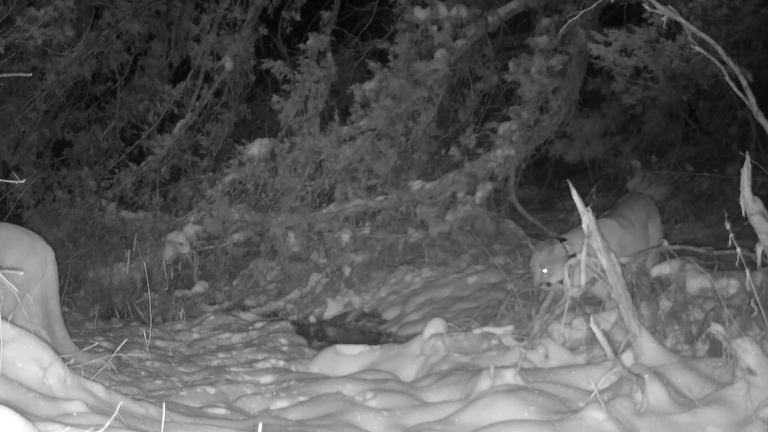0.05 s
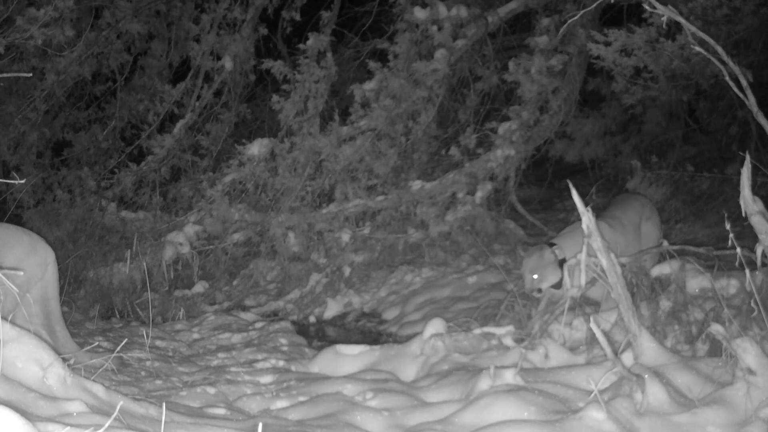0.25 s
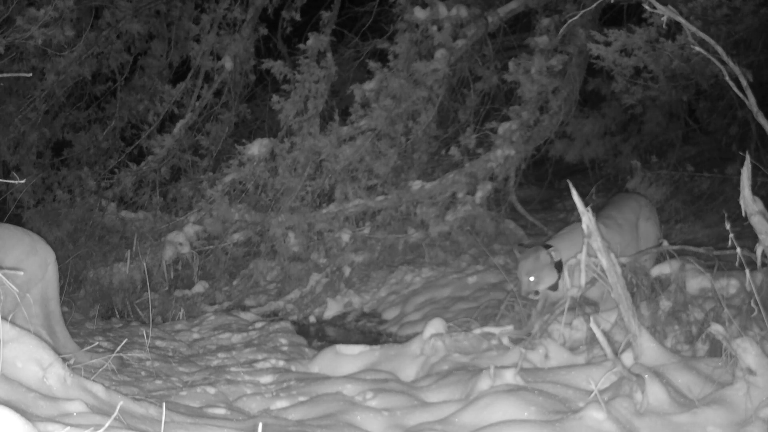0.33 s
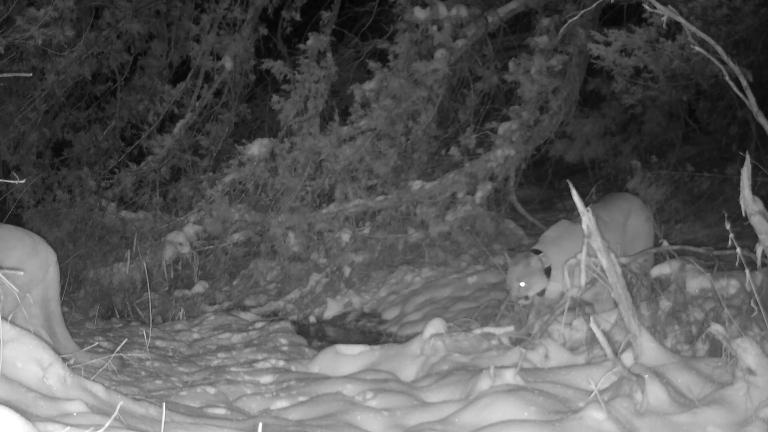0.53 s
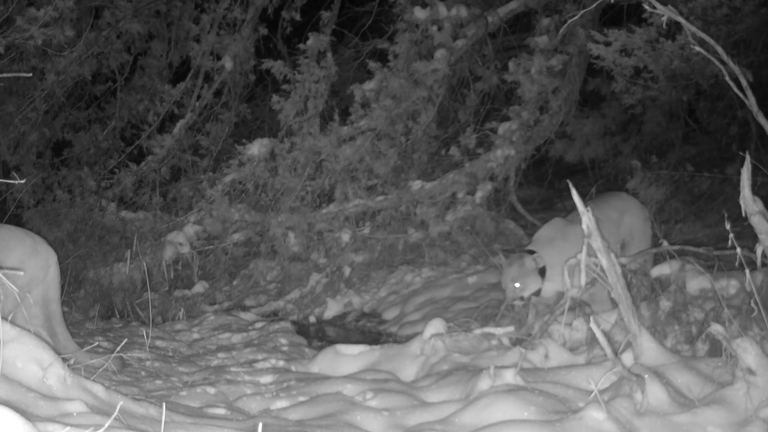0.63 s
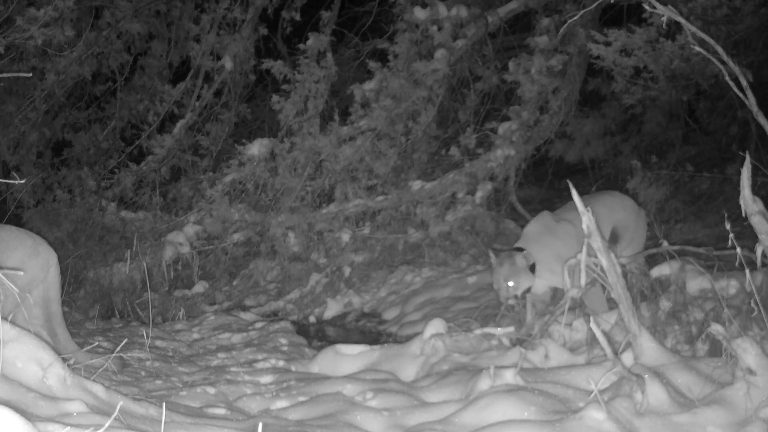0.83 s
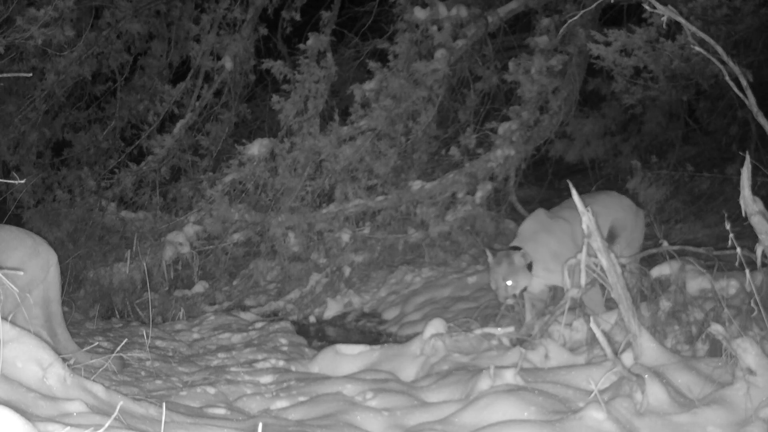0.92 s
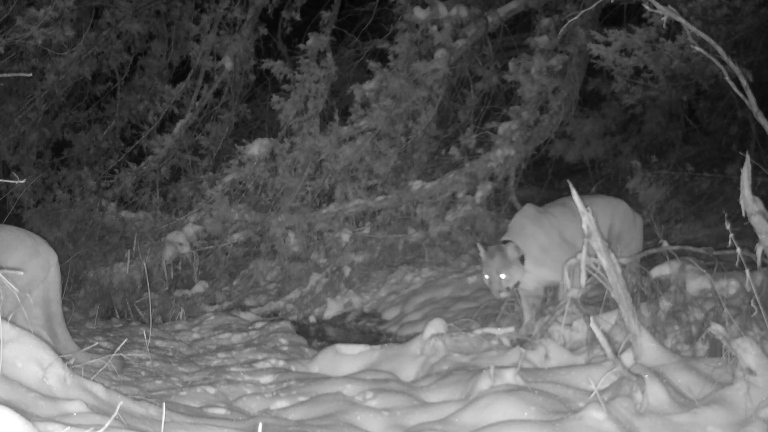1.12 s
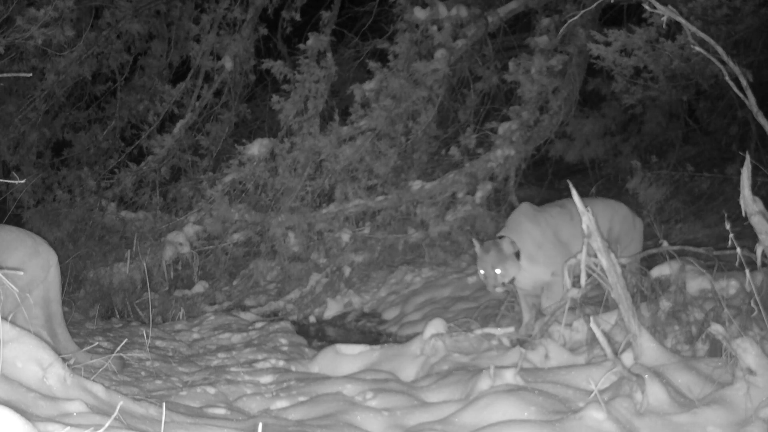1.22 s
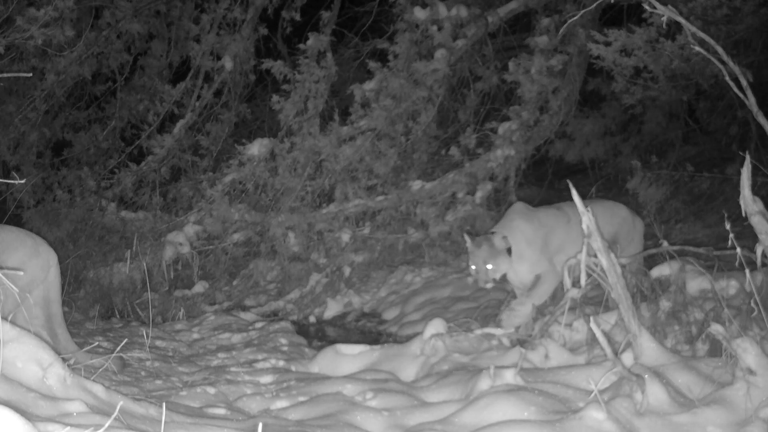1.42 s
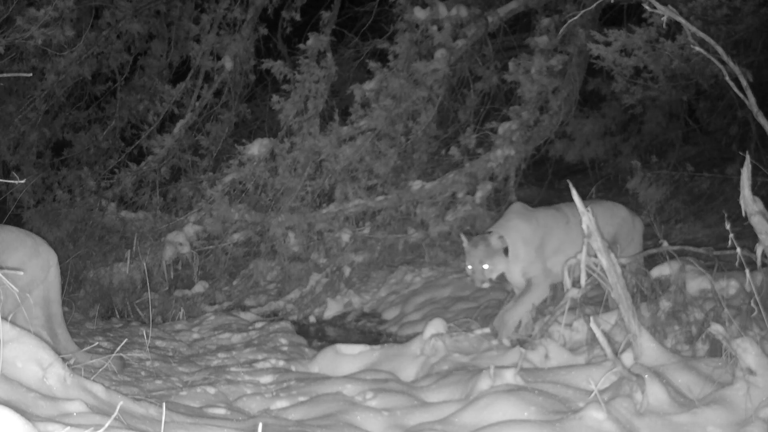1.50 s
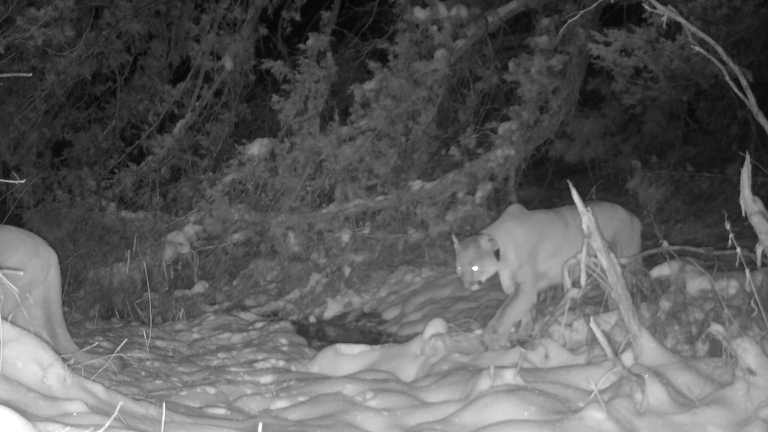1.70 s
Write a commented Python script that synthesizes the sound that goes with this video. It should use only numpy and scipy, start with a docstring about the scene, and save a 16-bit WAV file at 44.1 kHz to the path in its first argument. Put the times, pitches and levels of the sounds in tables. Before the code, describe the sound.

One raspy cry from a big wild cat sputters out in clicks, over soft steady hiss.

```python
"""A mountain lion in a clearing, heard through the narrow-band microphone of a trail camera.
The camera's own hiss and thin, buzzing whine run from the start. The cat gives a short creak that slows
to clicks, then one hoarse cry that swells, sags in pitch and sputters out in clicks and rasps of air.
Uneven vocal-fold pulses and a little turbulent air ring its throat and mouth.
The voice is well forward; behind it the trees answer faintly."""
import sys
import numpy as np
from scipy import signal
from scipy.fft import rfft, irfft
from scipy.io import wavfile

SR = 44100
rng = np.random.default_rng(int(sys.argv[2]) if len(sys.argv) > 2 else 0)


def master(y):
    """Save y as 16-bit WAV."""
    cut = np.clip(np.atleast_2d(y).T, -1, 1)
    pcm = np.round(cut * 32767)  # scale
    wavfile.write(sys.argv[1], SR, pcm.astype(np.int16))


N = 77175

# upper resonances of the throat and mouth: centre_hz, width_hz, relative_db
UPPER_RESONANCES = [(2750, 360, -23), (3360, 550, -9), (3790, 580, -12.5), (4036, 480, -14.5),
                    (4390, 300, -17)]
SCATTER = .02  # pulse-to-pulse spread of a resonance at full roughness, as a share of its frequency
CREAK_GAIN_DB, VOICE_GAIN_DB = 9, 10  # on top of the tabled levels: creak; cry and clicks


def amp(db):
    """Decibels to gain."""
    return 10 ** (np.asarray(db) / 20)


def unit(x):
    """Scale to rms 1."""
    return x / np.sqrt(np.mean(x ** 2) + 1e-20)


def at(rows, times):
    """Each column of a curve at the given times."""
    knots, *columns = np.transpose(rows)
    return [np.interp(times, knots, column) for column in columns]


def noise(colour):
    """Noise of rms 1 with a (frequency_hz, level_db) colour, falling steeply above its last point."""
    knots_hz, db = np.transpose(colour)
    hz = np.fft.rfftfreq(N, 1 / SR)
    gain = amp(np.interp(np.log(hz + 1), np.log(knots_hz), db)) / (1 + (hz / knots_hz[-1]) ** 12)
    return unit(irfft(rfft(rng.standard_normal(N)) * gain, N))


def cut(x, hz, kind, order):
    """Causal high-pass or low-pass."""
    return signal.sosfilt(signal.butter(order, hz, kind, fs=SR, output="sos"), x)


def camera_hiss(hiss_db=-56.5, fizz_db=-84.5):
    """The camera's noise floor: steady midrange hiss over a faint white fizz."""
    # spectrum of the hiss: frequency_hz, relative_db
    colour = [(15, -61.5), (25, -21), (131, -9), (196, -5.5), (258, -6.5), (316, -2.5), (362, -3.5),
              (433, -2), (475, -1.5), (508, -1.5), (730, 0), (2320, -5.5), (5600, -29.5), (7280, -64.5),
              (12300, -120)]
    return amp(hiss_db) * noise(colour) + amp(fizz_db) * rng.standard_normal(N)


def camera_whine(whine_hz=7796, flip_hz=29.68, lopsided=.3):
    """A lopsided electronic whine whose polarity flips with a tick about sixty times a second."""
    t = np.arange(N) / SR
    phase = 2 * np.pi * whine_hz * t
    polarity = np.sign(np.sin(2 * np.pi * flip_hz * (t - .003)))  # two flips a cycle
    buzz = cut((polarity + lopsided) * np.sin(phase), 12000, "low", order=4)
    edges = np.diff(polarity, prepend=polarity[0])
    ticks = cut(cut(edges, 4800, "high", order=2), 7200, "low", order=6)
    overtone = np.sin(2 * phase)
    return amp(-76) * unit(buzz) + amp(-88) * unit(ticks) + amp(-95.5) * unit(overtone)


def fold_closings(curve):
    """The times at which the vocal folds close, once in each cycle of the pulse rate."""
    t = np.arange(curve[0][0], curve[-1][0], 1 / SR)
    cycles = np.cumsum(at(curve, t)[0]) / SR
    return np.interp(np.arange(.5, cycles[-1]), cycles, t)


def ring_throat(times, pulse_db, resonances, air_db=-11, air_decay_s=.0008, rise_s=.00035):
    """Each pulse lets out a puff of air and rings the (centre_hz, width_hz, relative_db) resonances."""
    index = np.ceil(times * SR).astype(int)[:, None] + np.arange(1024)  # one row a pulse
    age = index / SR - times[:, None]
    column = lambda v: np.reshape(v, (-1, 1))
    wave = amp(air_db) * rng.standard_normal(age.shape) * np.exp(-age / air_decay_s)
    for hz, width, db in resonances:
        envelope = column(amp(db)) * np.exp(-np.pi * column(width) * age)
        wave += envelope * np.sin(2 * np.pi * column(hz) * age)
    wave = wave * (1 - np.exp(-age / rise_s)) * column(amp(pulse_db))
    return np.bincount(index.ravel(), wave.ravel(), N)[:N]


def creak():
    """Faint vocal-fold pulses grow and slow down."""
    # course of the creak: time_s, pulse_rate_hz, relative_db
    course = [(.183, 210, -59), (.2, 208, -53), (.215, 200, -45.5), (.227, 180, -46)]
    # throat resonances: centre_hz, width_hz, relative_db
    resonances = [(1300, 66, -3.5), (2000, 180, 0), (2600, 630, 6), (3400, 130, -15.5), (4490, 130, -15)]
    times = fold_closings(course)
    throat = [(hz * (1 + SCATTER * rng.standard_normal(len(times))), width, db)
              for hz, width, db in resonances]
    return ring_throat(times, at(course, times)[1] + CREAK_GAIN_DB, throat)


def clicks():
    """As the creak and the cry end, the folds close so slowly that each pulse stands apart."""
    # single closings: start_s, relative_db, upper_resonances_db
    closings = [(.2298, -38, 12), (.2368, -37, 10), (.2462, -35, 4), (.8425, -41, -8), (.859, -45, -7),
                (.888, -45, -6), (.93, -43, -6), (.94, -42, -6)]
    # lower throat resonances: centre_hz, width_hz, relative_db
    lower = [(1320, 220, -10), (1900, 260, -3)]
    times, pulse_db, upper_db = np.transpose(closings)
    upper = [(hz, width, db + upper_db) for hz, width, db in UPPER_RESONANCES]
    return ring_throat(times, pulse_db + VOICE_GAIN_DB, lower + upper)


def cry(jitter_periods=.055, shimmer_db=5, alternate_db=.6, stray_db=-10):
    """Rough pulses through a mouth that slowly closes; where hoarse, stray closings fall between them."""
    # vibration of the folds: time_s, pitch_hz, roughness_0_to_1
    pitch = [(.361, 118, .05), (.383, 148, .08), (.41, 162, .15), (.43, 190, .8), (.47, 270, 1),
             (.515, 278, .4), (.545, 268, .5), (.57, 270, .7), (.62, 250, .9), (.66, 240, .7),
             (.69, 236, .3), (.75, 214, .25), (.81, 187, .7), (.91, 180, 1)]
    # effort behind the cry: time_s, relative_db
    effort = [(.361, -42), (.391, -35.5), (.4, -31.5), (.447, -29.5), (.465, -36), (.495, -40.5),
              (.535, -34.5), (.552, -37), (.575, -35), (.6, -39.5), (.693, -40.5), (.706, -47),
              (.74, -39.5), (.765, -50), (.79, -43), (.808, -52), (.89, -55), (.91, -65)]
    # mouth resonances: time_s, main_hz, main_width_hz, lowest_hz, low_pair_db, upper_resonances_db
    mouth = [(.361, 2020, 290, 1300, -35, 4.5), (.398, 2000, 314, 1390, -22, -0.5),
             (.418, 2044, 320, 1343, -12, 3), (.448, 1824, 282, 1256, -8, -4.5),
             (.472, 2000, 223, 1237, -13.5, 0.5), (.54, 1890, 158.4, 1120, -12.5, -0.5),
             (.68, 1847, 125, 1162, -9, 3), (.745, 1687, 220, 1260, -7.5, 0.5),
             (.8, 1640, 281.9, 1274, -9.5, -7), (.91, 1720, 300, 1250, -5, -2)]
    times = fold_closings(pitch)
    pitch_hz, rough = at(pitch, times)
    late, size, low_shift, main_shift, upper_shift, stray = rough * rng.standard_normal((len(times), 6)).T
    main_hz, main_width_hz, lowest_hz, low_db, upper_db = at(mouth, times)
    lower = [(lowest_hz * (1 + SCATTER * low_shift), 130, low_db),
             (1410, 150, low_db + 2),
             (main_hz * (1 + SCATTER * main_shift), main_width_hz, 0)]
    upper = [(hz * (1 + SCATTER * upper_shift), width, db + upper_db)
             for hz, width, db in UPPER_RESONANCES]
    pulse_db = at(effort, times)[0] + VOICE_GAIN_DB
    stray_times = times + (.5 + .3 * np.tanh(stray)) / pitch_hz
    strays = ring_throat(stray_times, pulse_db + stray_db + 20 * np.log10(rough), lower)
    # pulses vary at random in size, and run strong and weak in turn
    uneven_db = shimmer_db * np.tanh(size) + alternate_db * rough * (-1) ** np.arange(len(times))
    jittered_times = times + jitter_periods * late / pitch_hz
    return ring_throat(jittered_times, pulse_db + uneven_db, lower + upper) + strays


def rasps():
    """The cry ends in toneless puffs of air."""
    # puffs: centre_s, half_length_s, level_db
    puffs = [(0.94, 0.008, -63.5), (0.989, 0.0092, -52), (1.038, 0.011, -59.5)]
    # spectrum of the breath: frequency_hz, relative_db
    colour = [(700, -41), (1300, -8), (1700, -1.5), (2080, 4.5), (2500, -11), (3500, -12.5), (4500, -8),
              (5500, -25)]
    t = np.arange(N) / SR
    envelope = sum(amp(db) * np.exp(-.5 * ((t - centre) / half) ** 2) for centre, half, db in puffs)
    return noise(colour) * envelope


def trees(voice, echo_db=-19, t60_s=.2):
    """The surrounding trees scatter a short, faint tail back to the microphone."""
    t = np.arange(SR // 2) / SR
    tail = rng.standard_normal(len(t)) * amp(-60 * t / t60_s)
    return amp(echo_db) * signal.fftconvolve(voice, tail / np.linalg.norm(tail))[:N]


def scene():
    """The cat in the clearing, in mono."""
    voice = creak() + clicks() + cry() + rasps()
    return (voice + trees(voice))[None]


def record(dry):
    """The trail camera: a thin microphone band with slight overload, its own noise and its band limit."""
    overload_db, leak_db, top_hz = -15, -52, 15750
    bassless = cut(dry, 1090, "high", order=7)
    thin = cut(bassless, 4450, "low", order=14) + amp(leak_db) * bassless  # a trace of treble gets past
    squashed = thin / np.sqrt(1 + (thin / amp(overload_db)) ** 2)
    heard = cut(squashed, 5800, "low", order=5) + camera_hiss() + camera_whine()
    return irfft(rfft(heard) * (np.fft.rfftfreq(N, 1 / SR) < top_hz), N)


dry = scene()
out = record(dry)
master(out)
```